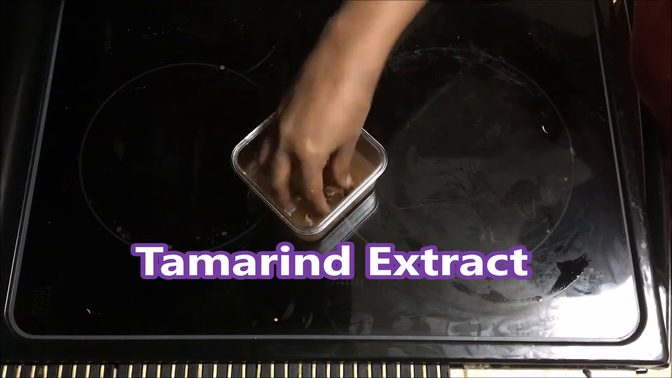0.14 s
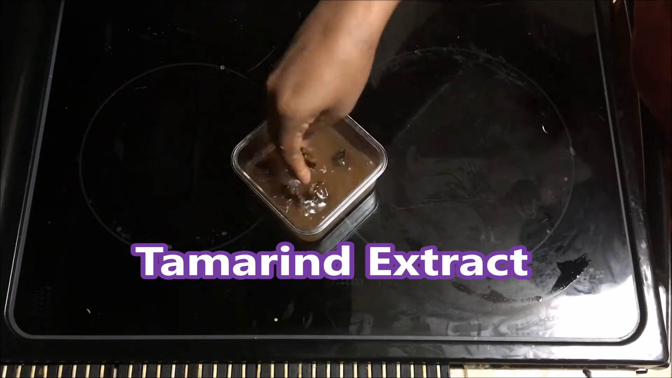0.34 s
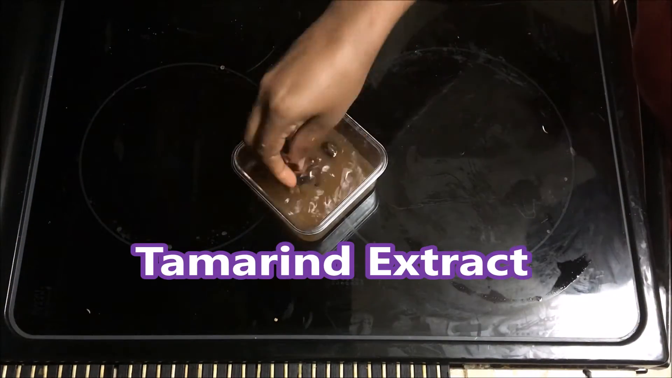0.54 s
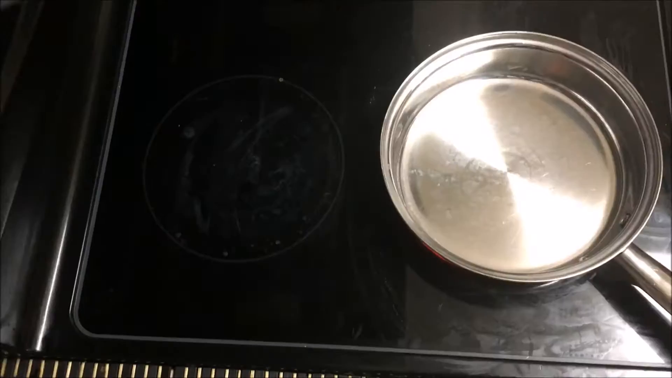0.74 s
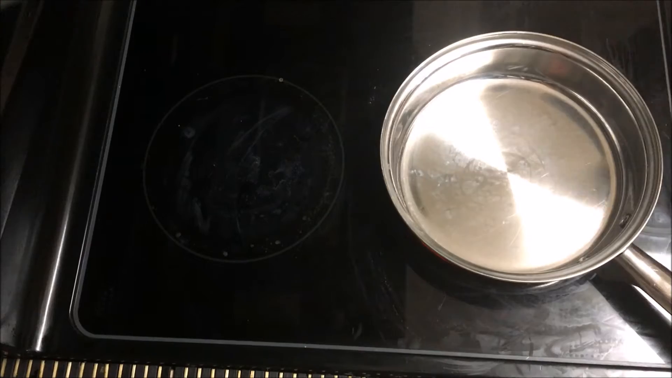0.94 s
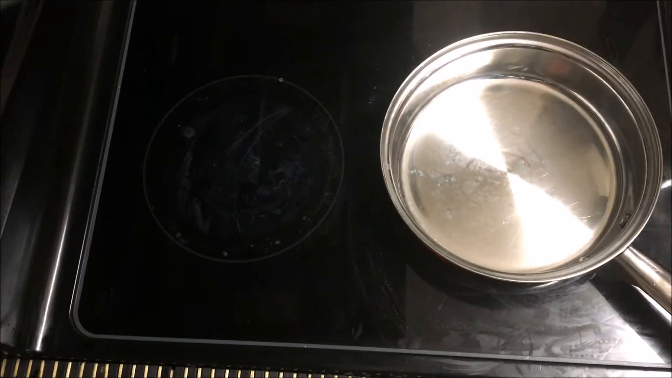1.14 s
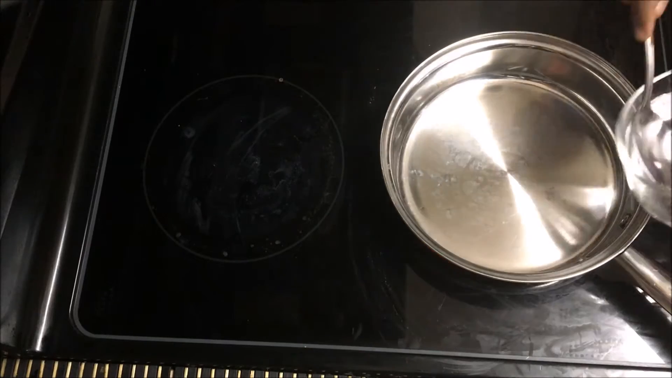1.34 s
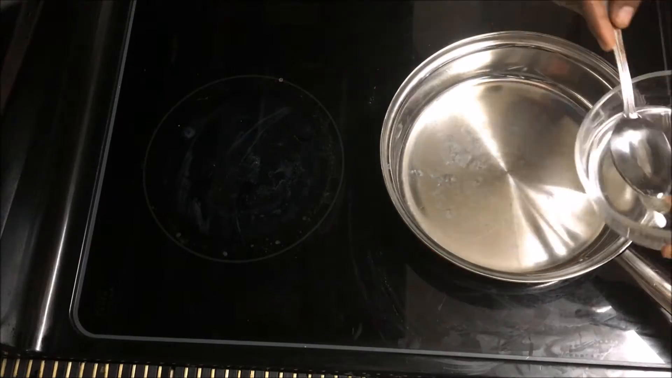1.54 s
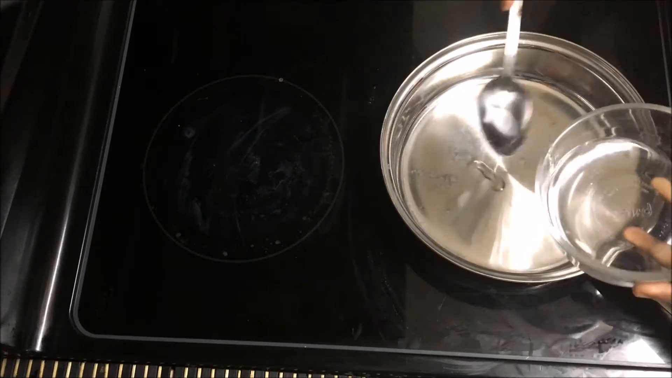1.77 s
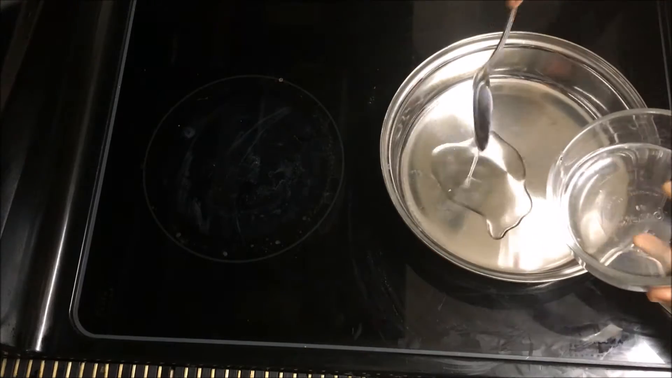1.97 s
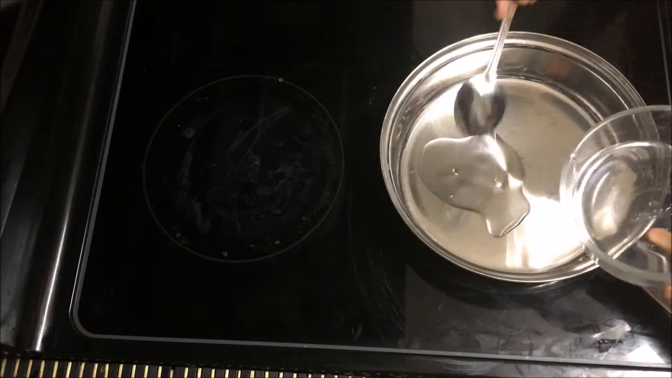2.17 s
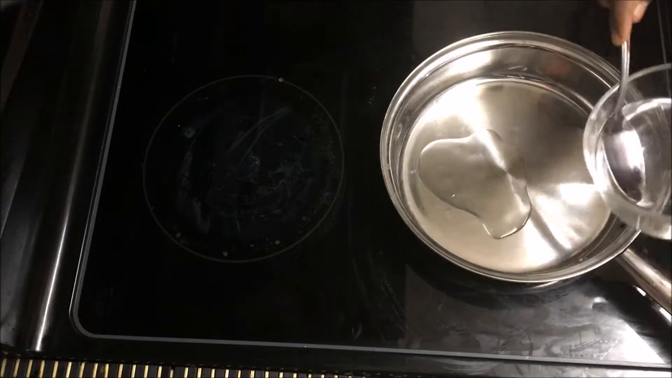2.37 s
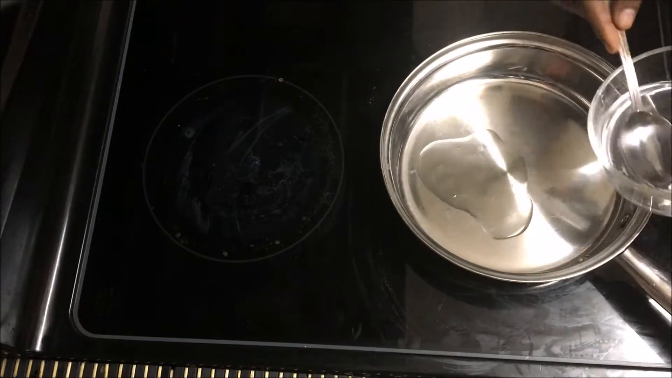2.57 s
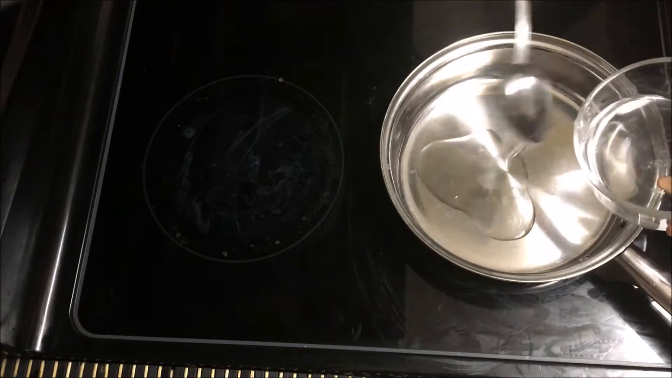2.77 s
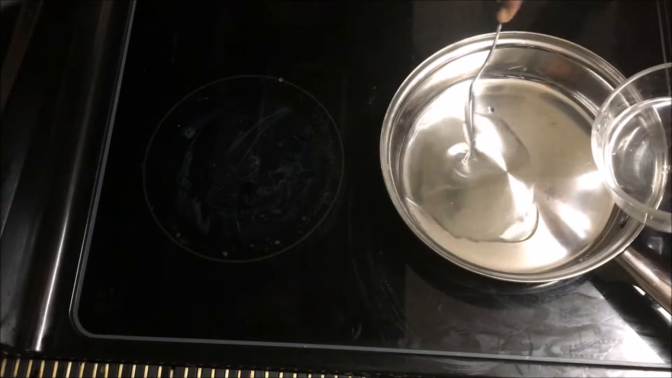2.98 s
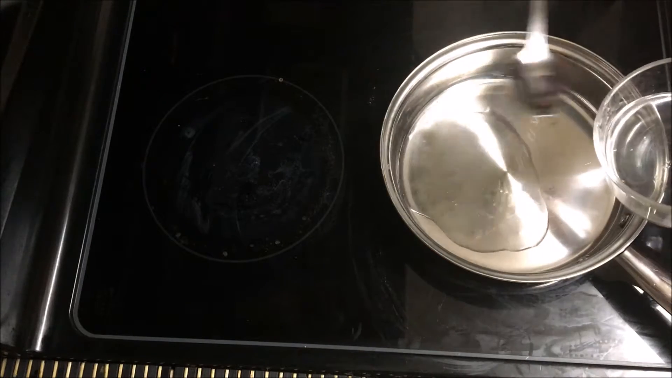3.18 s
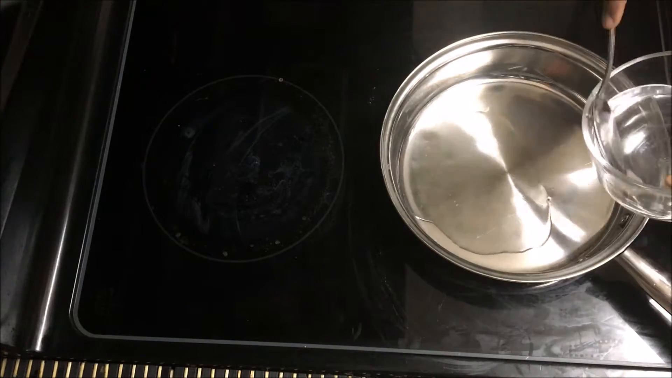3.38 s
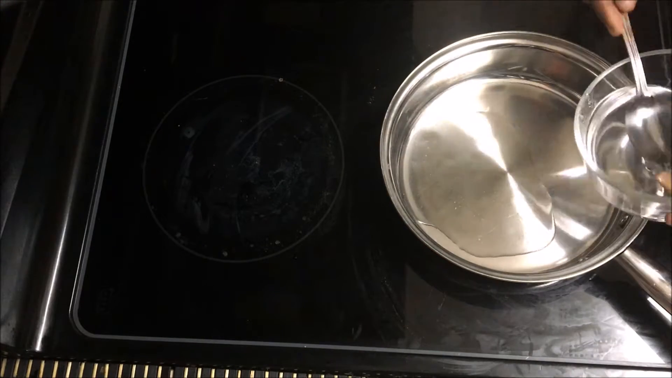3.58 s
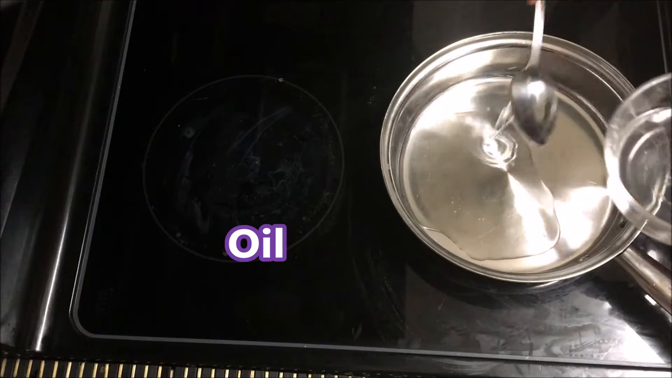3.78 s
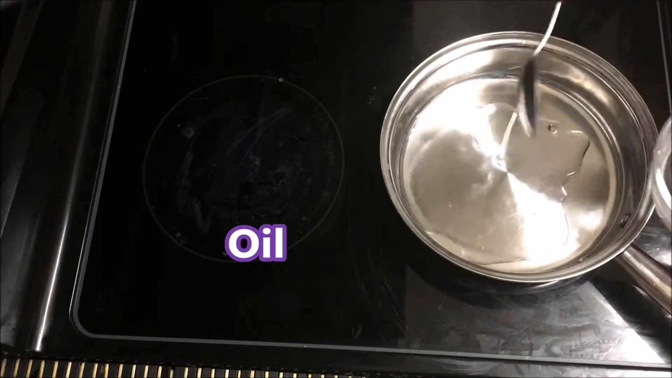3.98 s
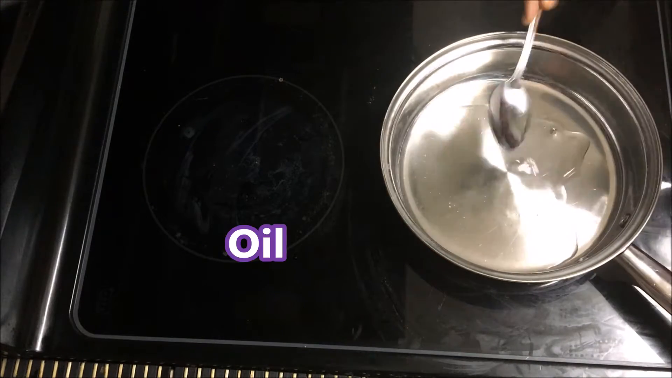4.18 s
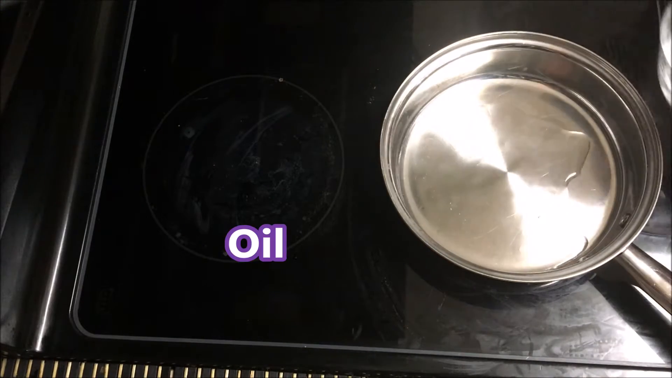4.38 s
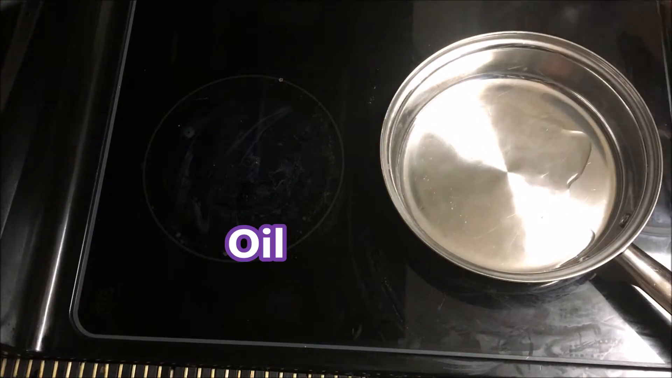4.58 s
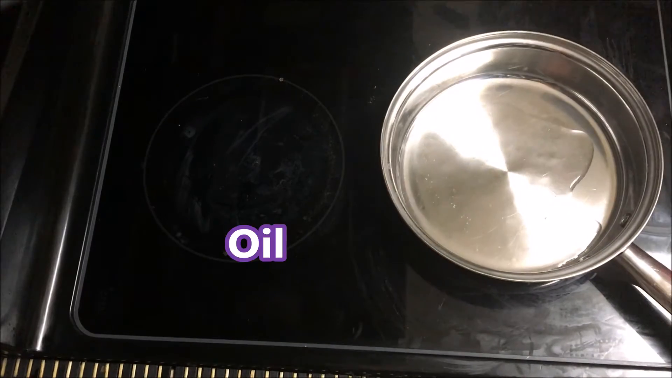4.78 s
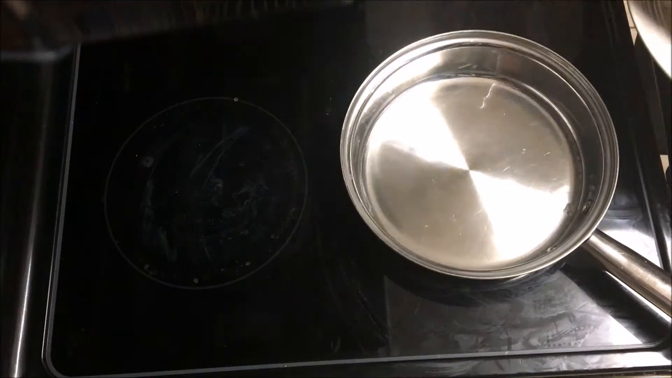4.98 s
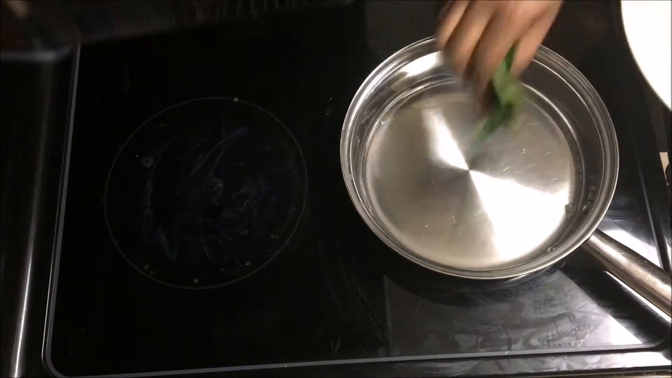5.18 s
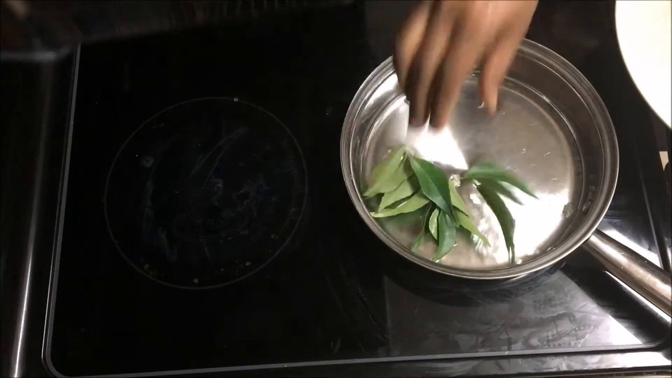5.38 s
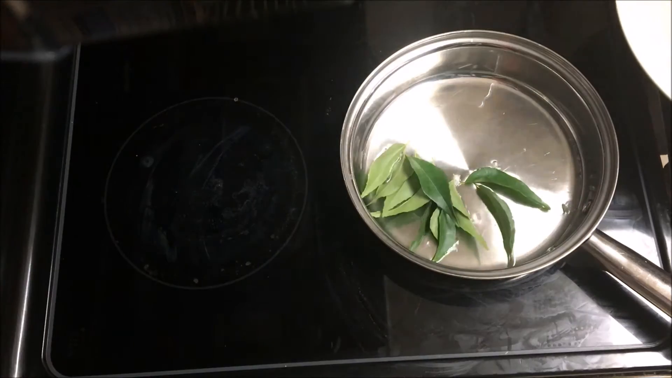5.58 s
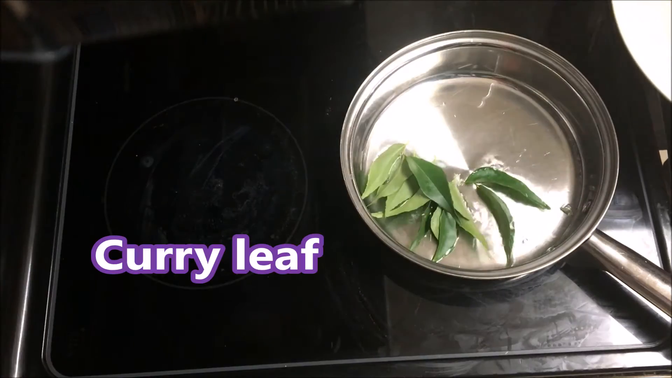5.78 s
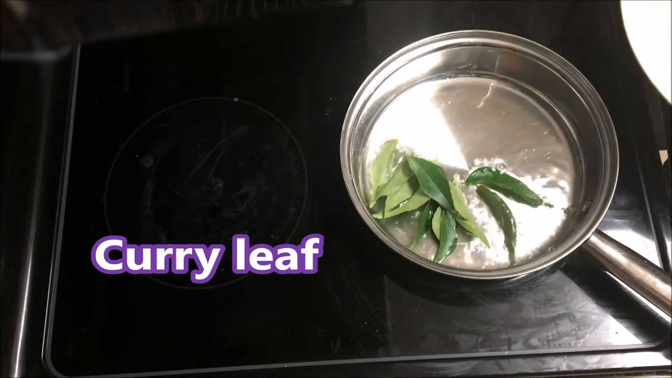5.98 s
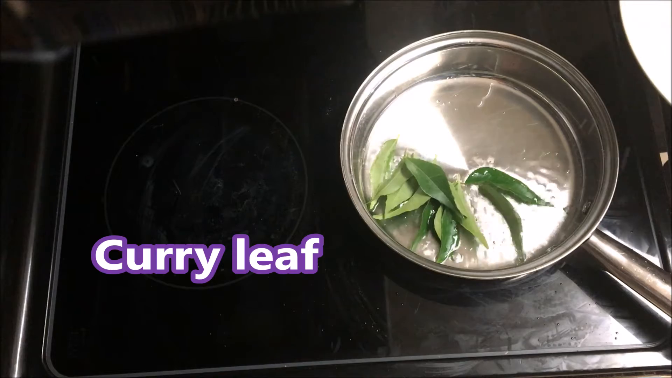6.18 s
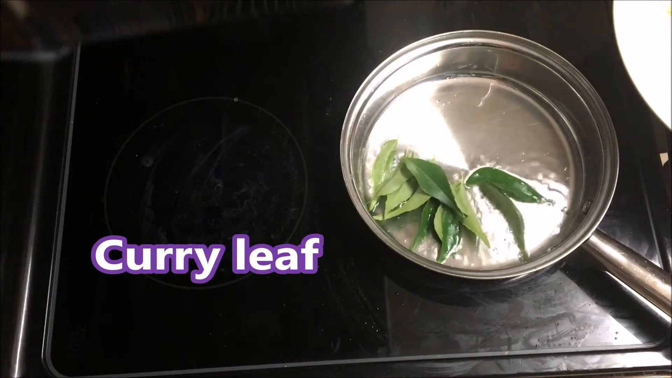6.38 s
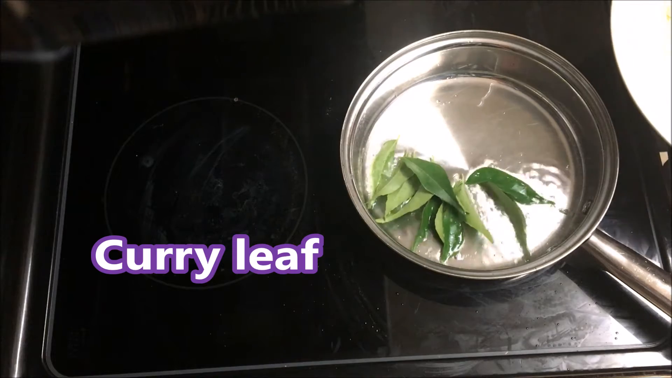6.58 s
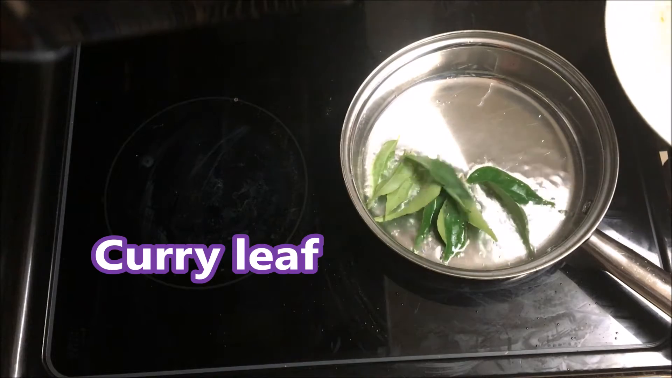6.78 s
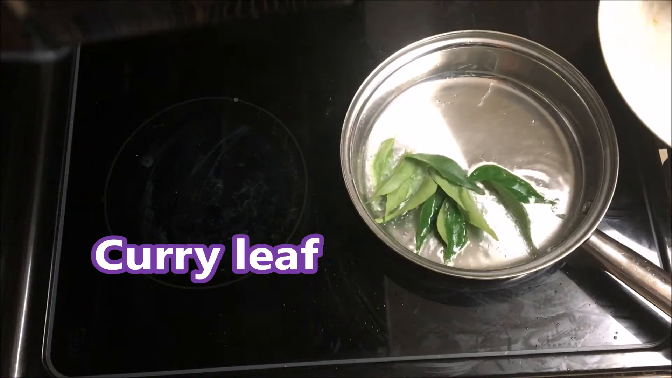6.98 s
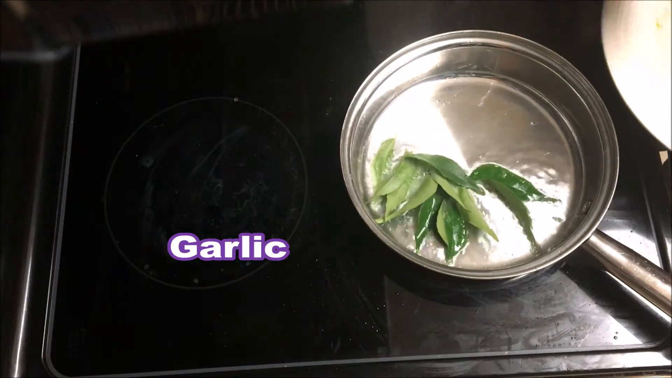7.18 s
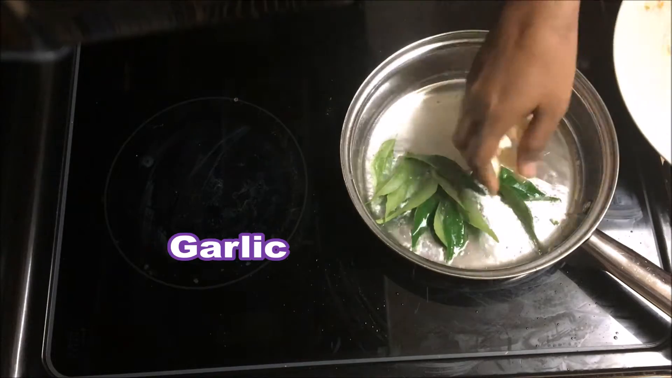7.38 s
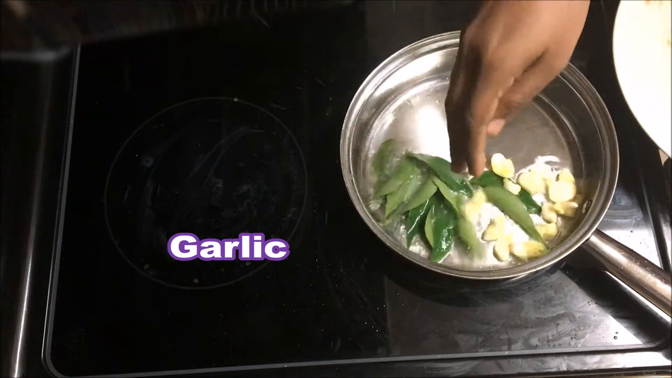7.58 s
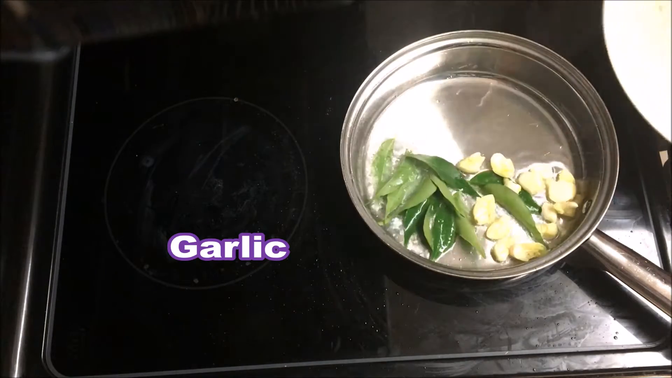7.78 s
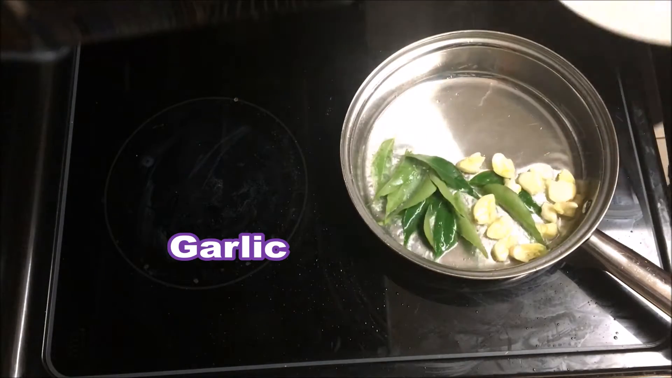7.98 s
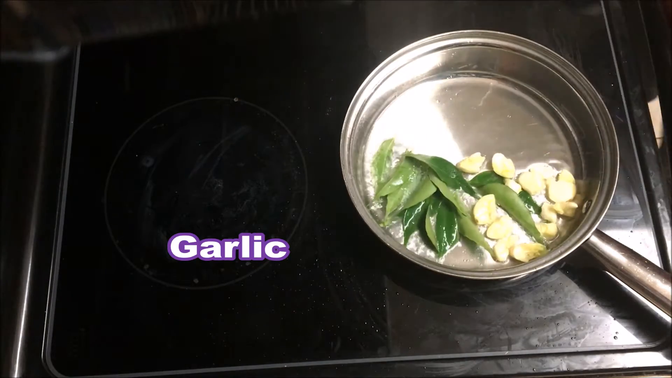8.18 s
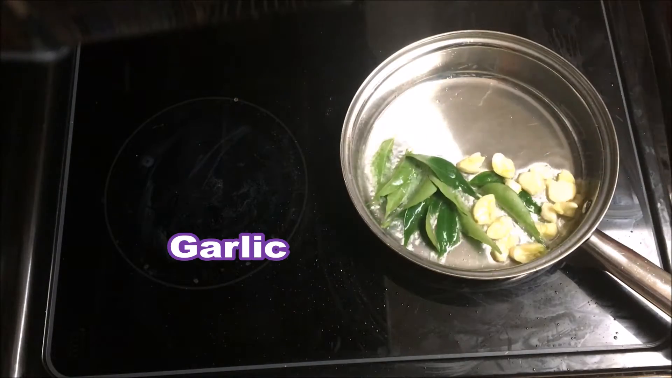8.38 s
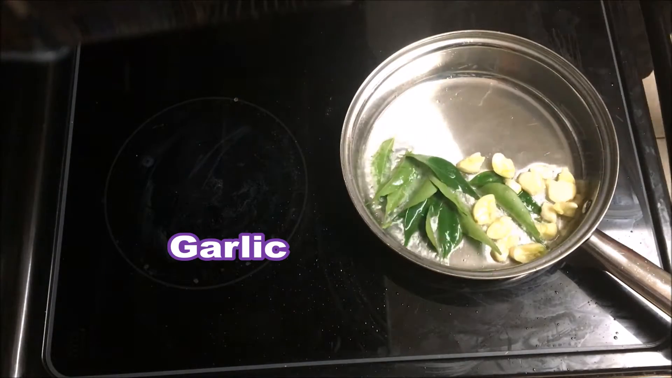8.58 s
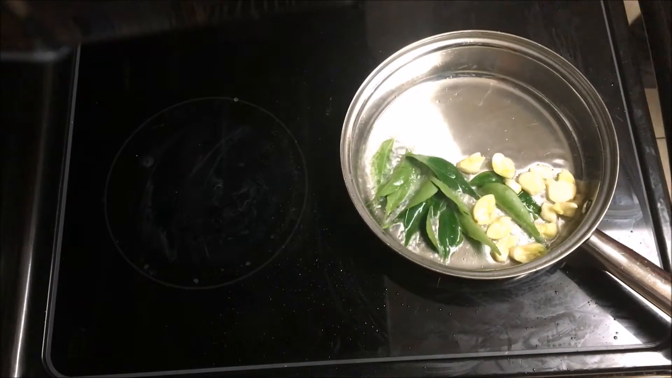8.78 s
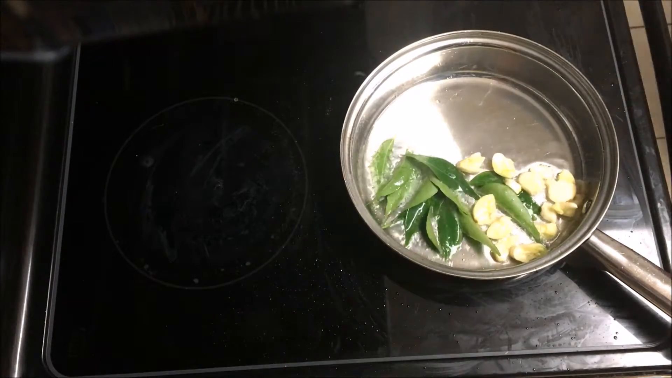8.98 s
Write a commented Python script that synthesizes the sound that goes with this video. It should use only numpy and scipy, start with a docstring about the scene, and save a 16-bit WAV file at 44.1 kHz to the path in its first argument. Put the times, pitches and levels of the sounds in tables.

```python
"""Cooking on a glass-top stove. Fingers squeeze wet tamarind: coloured echo bursts over quiet air noise. At 0.8 s
a fan's rush, motor hum, buzz and whine set in; a heating steel pan ticks (spike, echoes, ring) and a steel spoon
clinks on a glass bowl (tick and dying modes). Near 5 s the sound drops out for an instant; hot oil hisses faintly,
then curry leaves and garlic fry: sharp pops (coloured cracks with pan modes) over a fine sizzle (dense tiny pops
and hiss). At 8.5 s a dish is set down: hollow knocks. Bumps, scrapes and bubbles are short noise resonances."""
import sys
import numpy as np
from scipy import signal
from scipy.fft import rfft, irfft
from scipy.io import wavfile
from scipy.ndimage import uniform_filter1d

SR = 44100
rng = np.random.default_rng(int(sys.argv[2]) if len(sys.argv) > 2 else 0)


def materialize(psi):
    """Save the field psi as 16-bit PCM at rate SR to the path in sys.argv[1].

    A 1-D psi becomes a single channel; in a 2-D psi each row is a channel.
    """
    bounded = np.clip(np.atleast_2d(psi).T, -1, 1)
    quanta = np.round(bounded * 32767).astype(np.int16)
    wavfile.write(sys.argv[1], SR, quanta)


N = 398663
BLOW_SAMPLES = 16384
AGE_S, BINS_HZ = np.arange(BLOW_SAMPLES) / SR, np.fft.rfftfreq(BLOW_SAMPLES, 1 / SR)
TIME_S = np.arange(N) / SR

# air before the fan: f/Hz, density/dB per Hz (relative)
QUIET_SPECTRUM = [(18, -54), (30, -52), (95, -15), (179, 1.5), (245, -11.5), (384, 1), (486, -16.5),
                  (1350, -21), (1540, -24), (2170, -29), (5900, -33), (10500, -38.5), (16000, -40)]
# fan's rush: f/Hz, density/dB per Hz (relative)
FAN_SPECTRUM = [(15, -65), (25, -37), (97, 0), (141, -5.5), (223, -7), (270, -10), (317, -2), (427, -6.5),
                (516, -12.5), (1290, -17), (1560, -25), (3720, -32.5), (4740, -38), (11500, -38.5),
                (16000, -40)]
QUIET_DB, FAN_DB = -56.5, -54.5
# motor hum: f/Hz, level/dB
HUM_PARTIALS = [(107.7, -62), (215.6, -58.5), (240.5, -58.5), (323, -69.5), (352, -68.5), (431, -64.5),
                (478, -68), (565, -70), (732, -72), (870, -79)]
# thin whine: f/Hz, level before dropout/dB, level after/dB
WHINE_PARTIALS = [(2354, -81, -89), (2942.5, -83, -88), (3531, -95, -79), (3766.4, -77, -79),
                  (4355, -85, -89), (5532, -91, -84), (6356, -86, -93), (7062, -83, -87), (9063, -88, -88),
                  (10357.6, -84, -92)]
# motor buzz, envelope of its overtones: f/Hz, level per overtone/dB
BUZZ_ENVELOPE = [(1600, -94), (5000, -98), (9500, -97), (11500, -91), (15500, -103)]
HUM_START_S, DROPOUT_S = .787, (4.96, 4.9925)
HUM_WAVER_DB, HUM_BLUR_RAD = 0.36, 1.25
WHINE_WAVER_DB, WHINE_BLUR_RAD = 1.5, 0.25  # a slight phase blur; the whine stays thin and steady
BUZZ_HZ, BUZZ_SPREAD_DB = 117.7, 3.5
RETURN_CLICK_DB = -46.5
BAND_LIMIT_HZ = 16100

# dull bumps on stove and counter: t/s, level/dB, f/Hz
BUMP_EVENTS = [(0.562, -48.5, 171), (1.422, -40, 100), (1.438, -54, 66.3), (2.119, -51, 80),
               (2.63, -46, 260), (3.059, -52, 87), (4.001, -42, 152), (4.019, -49, 75), (4.09, -46.5, 80),
               (4.169, -44.5, 90), (7.031, -43.5, 89), (7.594, -41.5, 204), (7.752, -41, 227),
               (8.70, -33, 242)]
# soft scrapes of bowl and spoon: t/s, level/dB, f/Hz, t60/s
SCRAPE_EVENTS = [(1.207, -43.5, 4400, 0.11), (1.402, -49, 5330, 0.096), (4.663, -54, 2800, 0.12),
                 (4.691, -52, 3500, 0.11), (4.72, -56, 3200, 0.13)]
# ringing bubbles in pulp and oil: t/s, level/dB, f/Hz
BUBBLE_EVENTS = [(0.01, -60.5, 5940), (0.48, -61, 4300), (0.586, -57, 6800), (0.608, -47.5, 8300),
                 (2.043, -59, 10500), (5.657, -24, 6670), (6.762, -30, 6370), (7.318, -24.5, 3760),
                 (7.777, -24, 6470), (8.868, -25, 4200)]
BUMP_T60_CYCLES, BUBBLE_T60_S = 44, 0.041  # low bumps last longest

# Levels of the strikes below are those of the first 4 ms.
# fingers in the pulp: t/s, level/dB, tilt at 1.5 kHz/dB, tilt at 12 kHz/dB
SQUELCH_EVENTS = [(0.1395, -42.5, 4, -2), (0.1479, -47.5, 7, -9), (0.4325, -49, 23, -6),
                  (0.447, -55, -16, -3), (0.5075, -44, 3.5, -1), (0.6945, -44, 24, 11),
                  (0.7103, -50, -9, 4)]
# dish landing on one edge, then flat: t/s, level/dB, tilt at 1.5 kHz/dB
KNOCK_EVENTS = [(8.5202, -13.5, 6.5), (8.5275, -32, 13), (8.5735, -27.5, 1), (8.696, -30.5, 7)]
# ticks of the heating pan: t/s, level/dB, tilt at 12 kHz/dB
TICK_EVENTS = [(0.819, -26, 2.5), (1.215, -42.5, -3), (3.076, -48.5, 0), (3.108, -42.5, 3.5),
               (3.1695, -38.5, 4), (3.2224, -44, -10), (3.2439, -39, 2), (3.3, -40.5, -0.5),
               (3.374, -38.5, 0.5), (3.468, -40.5, 5.5), (3.697, -36.5, 1.5), (3.822, -36, 1.5),
               (3.936, -38.5, -1.5), (4.0106, -36.5, -0.5), (4.149, -35, 0), (4.3794, -34, 0.5)]
# spoon on bowl: t/s, level/dB, contact against ring/dB, extra on lowest mode/dB, tilt at 12 kHz/dB
CLINK_EVENTS = [(1.565, -29.5, -19, -9, -5.5), (2.626, -35, -12.5, -18, -15), (3.5452, -34.5, -14, 7, -9),
                (3.5771, -25, -15, 4.5, -7.5), (4.5559, -18.5, -4, -4, 3.5), (4.5628, -23, -1, 11, 0.5),
                (4.662, -37, 2, -9, 0), (4.676, -36.5, 0, -9, -7), (4.6924, -38, -1, -4, -7),
                (4.7186, -42, -5, -6, 6)]
# water bursting in oil: t/s, level/dB, tilt at 1.5 kHz/dB, tilt at 12 kHz/dB, cavity f/Hz
POP_EVENTS = [(5.641, -40, -11, 15, 12000), (5.6581, -29.5, -13, -21, 7000),
              (5.7535, -21.5, 12.5, -6, 2370), (5.823, -30.5, 4, -10, 7750), (5.873, -31, -3, 12, 14000),
              (5.8903, -21.5, -5.5, -19, 12200), (5.897, -22, -19, 5, 8500), (5.9056, -22.5, -6, -4, 2880),
              (5.909, -19, -4.5, -8, 7250), (5.9465, -21.5, -3, -7, 8050), (5.958, -26, -8, -5, 14200),
              (5.9779, -24.5, 1, -6, 9200), (5.984, -22.5, 0, 7, 3000), (5.99, -18.5, -0.5, -22, 3180),
              (6.0115, -12, -1.5, -3.5, 14200), (6.0533, -21, -1, 5, 4460), (6.073, -24.5, -4, 4, 9700),
              (6.1071, -24.5, -3, -1, 2700), (6.1228, -20, 0.5, -4, 2700), (6.1326, -21, 1, 4.5, 4400),
              (6.1726, -23.5, 0, -1, 4400), (6.1859, -20, 0, -10, 14500), (6.1968, -22, 13, 11, 2300),
              (6.2155, -15, -3, 1.5, 9800), (6.2344, -28.5, 4, -12, 2100), (6.2557, -15, -1, 1, 9600),
              (6.2732, -21.5, -5.5, -17, 14500), (6.3089, -22, -4, 0, 13400),
              (6.3121, -17, -4, -2.5, 13600), (6.34, -11.5, -5, 7, 2700), (6.3687, -21.5, -4, 1, 8200),
              (6.4488, -18.5, -2.5, 0.5, 12800), (6.459, -18, -2, 7.5, 1900), (6.4794, -26, -2, 0, 8700),
              (6.4905, -19.5, -3.5, -9, 10000), (6.4962, -17.5, -1, -2.5, 10000),
              (6.5003, -20.5, -1, -1, 14100), (6.528, -22, 0.5, 3, 3000), (6.542, -23.5, 0, -1, 14300),
              (6.561, -17.5, -2.5, -1.5, 13800), (6.6064, -25, -18, 8, 1800),
              (6.6145, -16, -3.5, -3, 14300), (6.6477, -32.5, 3, -5, 9000), (6.6733, -22.5, -15, -24, 8900),
              (6.678, -23, 0, 2, 8500), (6.6835, -17.5, -2.5, 0.5, 9200), (6.71, -22.5, -5, -8, 7300),
              (6.718, -16.0, 6, -5, 4380), (6.7409, -23, -4.5, -15, 7200), (6.7856, -20.5, -1, 13, 4450),
              (6.8085, -18.5, 3.5, 1.5, 14500), (6.9196, -20.5, 5, 0, 1930), (6.9236, -13.5, 2, 3.5, 3030),
              (6.9392, -23, -5, -2, 3100), (6.943, -19, -2, 1, 4100), (6.9783, -25, 2, -4, 14500),
              (6.992, -15, 4.5, 6.5, 3120), (7.0058, -28, 2, -3, 4300), (7.0268, -26.5, 9, 13, 9600),
              (7.0437, -18.5, -2, -0.5, 14400), (7.0802, -14, -4, 3.5, 2780),
              (7.1035, -19.5, 1, -6.5, 10500), (7.151, -23, 2, 2, 14200), (7.1784, -26.5, 4, 4.5, 2600),
              (7.202, -30, -15, 6, 13100), (7.3338, -17, -0.5, 4.5, 3120),
              (7.3528, -18.5, -1.5, -0.5, 10200), (7.4027, -15, -3, 4.5, 4450),
              (7.4487, -17.5, 5.5, 12, 11100), (7.486, -24.5, -2, 1, 3020), (7.5085, -22, -2, 6, 4400),
              (7.52, -16, 3, 5.5, 2880), (7.549, -27, -8, -4, 9600), (7.5545, -15.5, -3, 1, 13900),
              (7.5903, -19.5, 4, 2.5, 14500), (7.6006, -23, -4, -8, 8200), (7.6066, -22.0, -7, -13, 1800),
              (7.6518, -19.5, -4, -14, 10800), (7.6653, -14, -2, -8, 3540), (7.726, -33, 11, 7, 9500),
              (7.7504, -13.5, -4.5, 3, 4630), (7.8186, -18, 1.5, -3.5, 14400), (7.868, -23, 1, 1, 4530),
              (7.8905, -17.5, 0, -0.5, 9600), (7.9942, -23.5, 1, 7, 12500), (8.01, -26, -4, 3, 3000),
              (8.037, -24.5, -11, -4, 6750), (8.0902, -23, -2, 4, 3550), (8.0957, -24.5, 0, -20, 3600),
              (8.1273, -31, 11, 10, 5000), (8.1312, -22, 8, 10, 2920), (8.178, -17.5, -5.5, -4.5, 8800),
              (8.2047, -19, 1.5, -3, 2170), (8.2132, -15, -10, 20, 10600), (8.2194, -21, -9, 0, 8700),
              (8.2231, -21, -1.5, -8, 8800), (8.2288, -21, 5, 11, 11900), (8.2376, -25, -3, 11, 3200),
              (8.3055, -20, -6, -1, 8700), (8.3396, -13.5, -4.5, 7, 9900),
              (8.3637, -17.5, -4.5, 4.5, 10400), (8.388, -23, 8.5, -4, 6700),
              (8.4262, -21.5, -12, -10, 11400), (8.438, -31, -10, 1, 9300), (8.4802, -29, 11, 12, 7600),
              (8.5863, -18, -7, 1, 13700), (8.6212, -23.5, 2, -9, 3700), (8.656, -23, -4, 4, 8300),
              (8.6733, -15.5, 1.5, -3, 6840), (8.7072, -20.5, 8, 7.5, 4440), (8.7411, -36, -4, 10, 8400),
              (8.789, -29.5, 2, 0, 3000), (8.8094, -24, -0.5, -7, 12100), (8.8208, -19, 0, 5, 3730),
              (8.9363, -24.5, -9, -8, 3530), (9.003, -20, 2.5, 1.5, 11800)]
TICK_BODY_DB = 1  # tilt of every tick at 1.5 kHz
CLINK_BOUNCE_S, CLINK_BOUNCE_DB = 0.0055, -17
REMNANT_MAX_S, REMNANT_DB, REMNANT_SPREAD_DB = .004, -16, 4.5

# modes of the dish: f/Hz, share/dB, t60/s
DISH_MODES = [(265, 3.5, 0.085), (696, 4, 0.047), (890, 7, 0.041), (1375, 1, 0.046), (1812, 0, 0.091),
              (2143, 0, 0.12)]
# modes of a pan tick's thin ring: f/Hz, share/dB, t60/s
RIM_MODES = [(1116, 2, 0.12), (1982, -1.5, 0.13), (2043, -0.5, 0.14), (2770, -4.5, 0.14), (4220, 1, 0.076),
             (4670, -5, 0.11), (6700, 1, 0.15), (8240, -6, 0.11), (8450, 13.5, 0.049), (10700, 8, 0.026),
             (11400, 20, 0.029), (13700, 18, 0.038), (15800, 18, 0.033)]
# modes of spoon on bowl: f/Hz, share/dB, t60/s
SPOON_MODES = [(2885, -16.5, 0.085), (4850, -23, 0.058), (6560, -13, 0.061), (6650, 3, 0.056),
               (6720, -17, 0.11), (8200, -20, 0.088), (11540, 6.5, 0.029), (11600, -14, 0.11),
               (11810, 6.5, 0.017), (15300, -15, 0.043)]
# pan modes woken by pops: f/Hz, share/dB, t60/s
PAN_MODES = [(1190, 7.5, 0.016), (1870, -4, 0.13), (1827, -15.5, 0.4), (2130, 1, 0.05), (2433, 3.5, 0.059),
             (2880, 1, 0.081), (3000, 4.5, 0.037), (4106, 0, 0.035), (4530, 1.5, 0.064),
             (6670, 10.5, 0.039), (7250, -2, 0.061), (9040, 11, 0.019), (10500, -6, 0.06),
             (11600, -5, 0.023)]
# pitches that the pan swallows: f/Hz, width/Hz, gain/dB
PAN_NOTCHES = [(447, 185, -13), (736, 23, -15), (837, 42, -8), (942, 34, -11), (1900, 61, -13.5),
               (2400, 140, -3), (2760, 135, -6), (3383, 225, -6)]

# colour of a squelch: f/Hz, gain/dB
SQUELCH_COLOUR = [(100, -15), (480, 6.5), (750, 0), (1100, 5), (1500, -4), (3000, -3.5), (8000, -14.5),
                  (15500, -18)]
# colour of the dish's thud: f/Hz, gain/dB
THUD_COLOUR = [(40, -39), (150, -9), (330, 1), (520, -1.5), (720, 2), (950, -5), (2000, 1), (4000, -0.5),
               (15500, -12.5)]
# colour of a tick's crack: f/Hz, gain/dB
TICK_CRACK_COLOUR = [(100, -4), (800, -10), (2000, -10), (5000, -3.5), (8400, 0.5), (9700, -11.5),
                     (11500, -1), (15500, -1.5)]
# colour of the spoon's contact: f/Hz, gain/dB
CONTACT_COLOUR = [(100, -34), (1000, -29), (2000, -6), (5000, -5.5), (6800, 1.5), (8300, 6.5), (9500, -11),
                  (11700, 6.5), (15500, -2)]
# colour of a pop's crack: f/Hz, gain/dB
POP_CRACK_COLOUR = [(35, -60), (250, -1.5), (660, -0.5), (830, -6), (1100, -0.5), (1600, -1), (3000, 3.5),
                    (4200, 3.5), (5200, -1), (7000, 2), (9800, -2), (11500, 2), (13700, 0), (15500, -7)]

# frying over time: t/s, level/dB
FRYING_LEVEL = [(5.0, -64), (5.4, -72), (5.49, -47), (5.6, -64), (5.72, -52), (5.85, -43), (6.05, -34),
                (6.15, -40.5), (6.31, -26), (6.41, -44), (6.5, -37.5), (6.8, -38), (6.87, -36.5),
                (6.95, -34), (7.25, -35.5), (7.55, -35), (7.8, -31), (8.25, -32.5), (9.04, -31.5)]
# smooth hiss of the frying: f/Hz, density/dB per Hz (relative)
HISS_SPECTRUM = [(290, -46), (500, -25), (1230, -15), (1930, -17), (3860, 0), (5630, -13), (6700, 4.5),
                 (9920, 0.5), (11800, 5), (16000, 2.5)]
CRACKLE_START_S = 5.85  # the leaves are hot enough to spit
CAVITY_DB = 6.5
POP_SPREAD_DB = 4.5  # random spread of echo strength: some pops are sharper, others more smeared

# the surfaces stay put, so every blow shares part of its echo pattern
KITCHEN_ECHOES = rng.standard_normal(BLOW_SAMPLES)
SHARED_ECHOES = 0.7  # weight against fresh echoes of weight 1


def amp(db):
    """Decibels to gain."""
    return 10 ** (np.asarray(db) / 20)


def unit(x):
    """Scales to an rms of one."""
    return x / np.sqrt(np.mean(x ** 2) + 1e-20)


def read(points, hz):
    """Interpolates a spectrum table in dB on a log-frequency axis."""
    f, db = np.transpose(points)
    return np.interp(np.log(hz + 1), np.log(f + 1), db)


def add(mix, s, sound):
    """Lays a sound into the mix at time s, cut at the mix's end."""
    part = mix[round(s * SR):][:len(sound)]
    part += sound[:len(part)]


def noise(points):
    """Steady noise of a given spectrum and unit rms."""
    gain = amp(read(points, np.fft.rfftfreq(N, 1 / SR)))
    return unit(irfft(rfft(rng.standard_normal(N)) * gain, N))


def drift(hz):
    """Slow random wander of unit rms: 2 * hz random knots a second, joined by lines."""
    knots = rng.standard_normal(BLOW_SAMPLES)
    return unit(np.interp(TIME_S * 2 * hz, np.arange(BLOW_SAMPLES), knots))


def coloured(x, db):
    """Minimum-phase filter of gain db per bin: nothing sounds before the blow."""
    log_gain = np.log(amp(np.r_[db, db[-2:0:-1]]))
    response = np.exp(np.conj(signal.hilbert(log_gain)))[:len(db)]
    return irfft(rfft(x) * response, BLOW_SAMPLES)


def blow(scatter_db, scatter_t60, room_db, room_t60):
    """Spike, dense echoes off nearby surfaces, kitchen tail; levels are energies against the spike, t60 in s."""
    x = -signal.unit_impulse(BLOW_SAMPLES)
    for db, t60 in ((scatter_db, scatter_t60), (room_db, room_t60)):
        pattern = SHARED_ECHOES * KITCHEN_ECHOES + rng.standard_normal(BLOW_SAMPLES)
        echoes = pattern * amp(-60 * AGE_S / t60)
        x = x + amp(db) * echoes / np.linalg.norm(echoes)
    return x


def ring(modes, spread_db):
    """Dying modes, unit energy in all; their shares change with the spot that is struck."""
    hz, db, t60 = np.transpose(modes)[:, :, None]
    share_db = db + spread_db * rng.standard_normal(hz.shape)
    envelopes = amp(share_db - 60 * AGE_S / t60)
    waves = np.sin(2 * np.pi * (hz * AGE_S + rng.random(hz.shape)))
    x = (envelopes * waves).sum(0)
    return x / np.linalg.norm(x)


def voiced(x, db, low_db=0, high_db=0):
    """Tilts one strike about 5 kHz, then sets the rms level of its first 4 ms."""
    x = coloured(x, read([(1500, low_db), (5000, 0), (12000, high_db)], BINS_HZ))
    return amp(db) * x / np.sqrt(np.mean(x[AGE_S < .004] ** 2))


def strikes(rows, make):
    """Plays a table of strikes, each a fresh one."""
    out = np.zeros(N)
    for s, *tone in rows:
        add(out, s, voiced(make(), *tone))
    return out


def bursts(rows, sharpness, rise_s, grain_db=0):
    """Dying noise resonances; sharpness is pitch over width, grain the stick and slip of a scrape."""
    out = np.zeros(N)
    for s, db, hz, t60 in rows:
        resonance = 1 / (1 + (sharpness * np.log((BINS_HZ + 1) / hz)) ** 2)
        band = irfft(rfft(rng.standard_normal(BLOW_SAMPLES)) * resonance)
        slips_db = grain_db * unit(uniform_filter1d(rng.standard_normal(BLOW_SAMPLES), size=90))
        x = band * amp(slips_db - 60 * AGE_S / t60) * (1 - np.exp(-AGE_S / rise_s))
        add(out, s, amp(db) * x / np.sqrt(np.sum(x ** 2) / (SR * t60 / 10)))
    return out


def motor_hum():
    """Low sine partials, each wavering in level and phase."""
    out = np.zeros(N)
    for hz, db in HUM_PARTIALS:
        phase = 2 * np.pi * hz * TIME_S + HUM_BLUR_RAD * drift(5)
        out += amp(db + HUM_WAVER_DB * drift(6.5)) * np.sqrt(2) * np.sin(phase)
    return out


def whine():
    """Thin steady high partials with a slight phase blur; their balance changes at the dropout."""
    out = np.zeros(N)
    for hz, before_db, after_db in WHINE_PARTIALS:
        level_db = np.where(TIME_S < DROPOUT_S[0], before_db, after_db) + WHINE_WAVER_DB * drift(1.79)
        phase = 2 * np.pi * hz * TIME_S + WHINE_BLUR_RAD * drift(18)
        out += amp(level_db) * np.sqrt(2) * np.sin(phase)
    return out


def buzz():
    """One uneven cycle of the motor, a comb of overtones, repeated at a barely drifting speed."""
    hz = BUZZ_HZ * np.arange(BLOW_SAMPLES // 2 + 1)
    db = read(BUZZ_ENVELOPE, hz) + BUZZ_SPREAD_DB * rng.standard_normal(len(hz))
    phases = np.exp(2j * np.pi * rng.random(len(hz)))
    overtones = amp(db) * phases * (hz > 0) * (hz < BAND_LIMIT_HZ)
    cycle = irfft(overtones) * BLOW_SAMPLES / np.sqrt(2)
    turns = BUZZ_HZ * TIME_S + .002 * drift(2)
    return np.interp(turns % 1 * BLOW_SAMPLES, np.arange(BLOW_SAMPLES), cycle)


def kitchen():
    """Quiet air noise, then at once the fan's rush with motor hum, whine and buzz."""
    fan = amp(FAN_DB) * noise(FAN_SPECTRUM) + motor_hum() + whine() + buzz()
    return np.where(TIME_S < HUM_START_S, amp(QUIET_DB) * noise(QUIET_SPECTRUM), fan)


def return_click():
    """A faint pop-shaped click as the sound comes back after the dropout."""
    return strikes([(DROPOUT_S[1], RETURN_CLICK_DB)], pop)


def bumps():
    """Broad low resonances that die in a fixed count of cycles."""
    rows = [(s, db, hz, BUMP_T60_CYCLES / hz) for s, db, hz in BUMP_EVENTS]
    return bursts(rows, sharpness=4.2, rise_s=0.00073)


def scrapes():
    """Bowl and spoon rub: very broad resonances, grained by stick and slip."""
    return bursts(SCRAPE_EVENTS, sharpness=1.4, rise_s=0.0058, grain_db=4)


def bubbles():
    """Small bubbles ring as narrow resonances with a fast attack."""
    rows = [(*row, BUBBLE_T60_S) for row in BUBBLE_EVENTS]
    return bursts(rows, sharpness=9.9, rise_s=0.0001)


def squelch():
    """A pocket of air escapes from wet pulp inside the hand."""
    puff = blow(scatter_db=5, scatter_t60=0.047, room_db=-3, room_t60=0.17)
    return coloured(puff, read(SQUELCH_COLOUR, BINS_HZ))


def knock():
    """A dish lands on the counter: a hollow thud and the dish's modes."""
    impact = blow(scatter_db=13, scatter_t60=0.038, room_db=6, room_t60=0.37)
    thud = coloured(impact, read(THUD_COLOUR, BINS_HZ))
    return thud + amp(2.0) * ring(DISH_MODES, spread_db=1.5)


def tick():
    """Steel slips as it expands: a bright tick with a thin ring."""
    crack = blow(scatter_db=8, scatter_t60=0.051, room_db=4, room_t60=0.2)
    return coloured(crack, read(TICK_CRACK_COLOUR, BINS_HZ)) + amp(8.5) * ring(RIM_MODES, spread_db=3)


def pan_ticks():
    """The pan ticks as it heats."""
    return strikes([(s, db, TICK_BODY_DB, treble_db) for s, db, treble_db in TICK_EVENTS], tick)


def clink(contact_db, lowest_db):
    """Spoon meets glass: a contact tick and dying modes, both echoed by the kitchen."""
    impact = blow(scatter_db=4.0, scatter_t60=0.036, room_db=-10, room_t60=0.14)
    contact = coloured(impact, read(CONTACT_COLOUR, BINS_HZ))
    (hz, db, t60), *upper = SPOON_MODES
    modes = ring([(hz, db + lowest_db, t60), *upper], spread_db=3.0)
    echoes = blow(scatter_db=-1.5, scatter_t60=0.033, room_db=-7.5, room_t60=0.19)
    touch = amp(contact_db) * contact / np.linalg.norm(contact) + modes
    return signal.fftconvolve(touch, echoes)[:BLOW_SAMPLES]


def spoon():
    """Each touch has its own hardness, wakes the lowest mode more or less, and chatters once."""
    out = np.zeros(N)
    for s, db, contact_db, lowest_db, treble_db in CLINK_EVENTS:
        x = clink(contact_db, lowest_db)
        bounce = amp(CLINK_BOUNCE_DB) * clink(contact_db, lowest_db)
        add(x, CLINK_BOUNCE_S * rng.uniform(.7, 1.3), bounce)
        add(out, s, voiced(x, db, 0, treble_db))
    return out


def frying_db(t):
    """Level of the frying at time t: silent before 5 s, then a faint hiss of hot oil until the leaves come."""
    return np.interp(t, *np.transpose(FRYING_LEVEL), left=-np.inf)


def pop(cavity_hz=None):
    """A drop flashes to steam: a crack, tinted by its cavity, bounces round the pan wall and rings the steel."""
    scatter_db = -2 + POP_SPREAD_DB * rng.standard_normal()
    crack = blow(scatter_db, scatter_t60=0.016, room_db=-4, room_t60=0.1)
    notches_db = sum(db / (1 + ((BINS_HZ - hz) / width) ** 4) for hz, width, db in PAN_NOTCHES)
    cavity_hz = cavity_hz or np.exp(rng.uniform(np.log(3000), np.log(15000)))
    cavity_db = CAVITY_DB / (1 + (10 * (BINS_HZ / cavity_hz - 1)) ** 2)
    colour_db = read(POP_CRACK_COLOUR, BINS_HZ) + notches_db + cavity_db
    return coloured(crack, colour_db) + amp(-7.0) * ring(PAN_MODES, spread_db=3.5)


def sizzle(per_s, size_db, tilt_db, count=16):
    """Hundreds of tiny bursts a second, in count pop shapes, above a smooth hiss."""
    fry = np.zeros(N)
    for _ in range(count):
        sizes = amp(size_db * np.minimum(rng.exponential(1, N), 4))
        train = sizes * (rng.random(N) < per_s / count / SR)
        low_db, high_db = tilt_db * rng.standard_normal(2) + [-4, 0]
        fry += signal.oaconvolve(train, voiced(pop(), 0, low_db, high_db))[:N]
    return amp(frying_db(TIME_S)) * (amp(-5.0) * unit(fry) + amp(-7.5) * noise(HISS_SPECTRUM))


def crackle(per_s, over_db, spread_db, tilt_db, body_db, count=12, size=300):
    """Smaller pops, one at a random moment of each 1/per_s slot, at most over_db above frying_db."""
    shapes = []
    for _ in range(count):
        low_db, high_db = tilt_db * rng.standard_normal(2) + [body_db, 0]
        shapes.append(voiced(pop(), 0, low_db, high_db))
    out = np.zeros(N)
    for k, (when, softness) in enumerate(rng.random((size, 2))):
        s = CRACKLE_START_S + (k + when) / per_s
        add(out, s, amp(frying_db(s) + over_db - spread_db * softness) * shapes[k % count])
    return out


def big_pops():
    """Each drop bursts and its remnant follows at once; each has its own body, brightness and cavity."""
    out = np.zeros(N)
    for s, db, body_db, treble_db, cavity_hz in POP_EVENTS:
        x = pop(cavity_hz)
        remnant = amp(REMNANT_DB + REMNANT_SPREAD_DB * rng.standard_normal()) * x
        add(x, REMNANT_MAX_S * rng.uniform(0.22, 1), remnant)
        add(out, s, voiced(x, db, body_db, treble_db))
    return out


def scene():
    """Sums everything on and around the stove, background first."""
    background = kitchen() + return_click() + bumps() + scrapes() + bubbles()
    handling = strikes(SQUELCH_EVENTS, squelch) + strikes(KNOCK_EVENTS, knock) + pan_ticks() + spoon()
    frying = sizzle(per_s=600, size_db=7.0, tilt_db=3.5)
    frying += crackle(per_s=32, over_db=3.0, spread_db=10.5, tilt_db=6.0, body_db=-5.0)
    frying += big_pops()
    return (background + handling + frying)[None]


def record(dry):
    """Cuts deep bass, mutes the dropout, clips spikes, then limits the band."""
    highpass = signal.butter(3, 50, "highpass", fs=SR, output="sos")
    thin = signal.sosfilt(highpass, dry)
    live = (TIME_S < DROPOUT_S[0]) | (TIME_S > DROPOUT_S[1])
    held = np.clip(thin * live, -.9, .9)
    lowpass = signal.firwin(201, BAND_LIMIT_HZ, window=("kaiser", 10), fs=SR)
    return signal.oaconvolve(held, lowpass[None], "same")


dry = scene()
out = record(dry)
materialize(out)
```